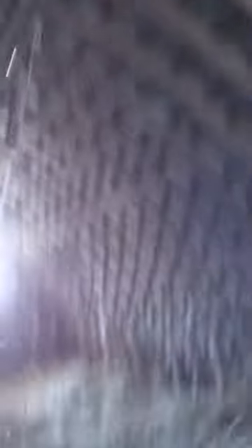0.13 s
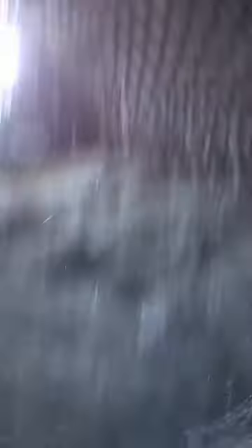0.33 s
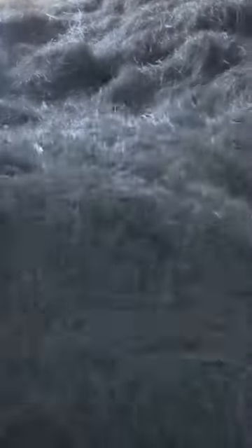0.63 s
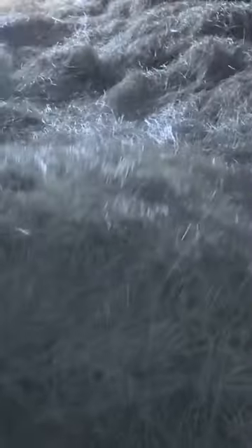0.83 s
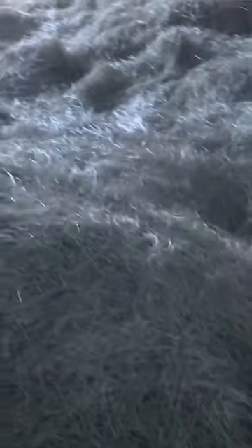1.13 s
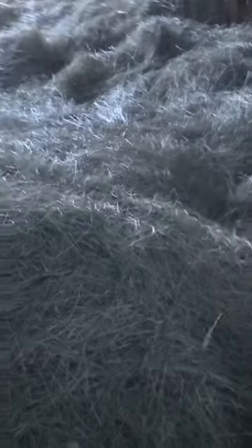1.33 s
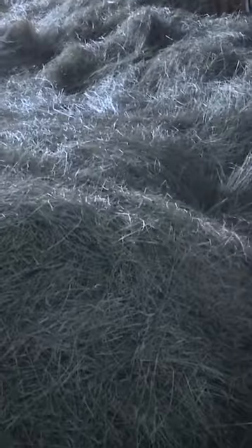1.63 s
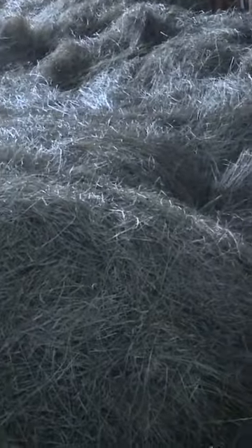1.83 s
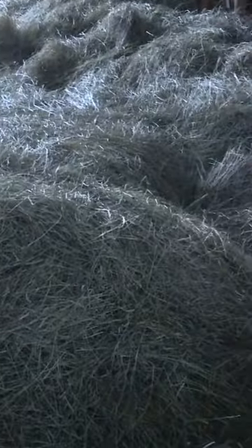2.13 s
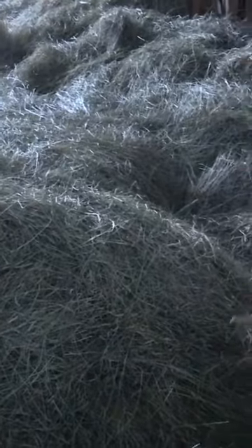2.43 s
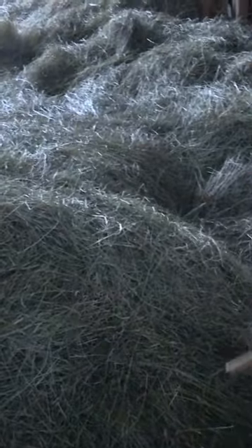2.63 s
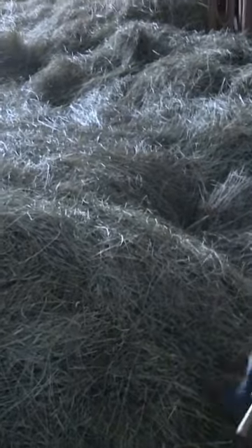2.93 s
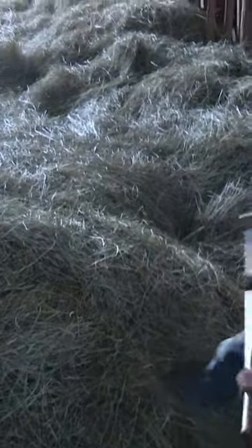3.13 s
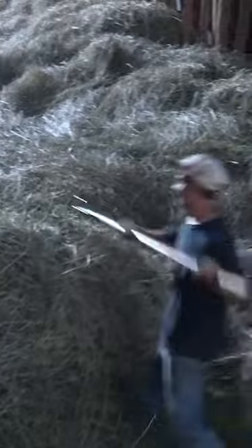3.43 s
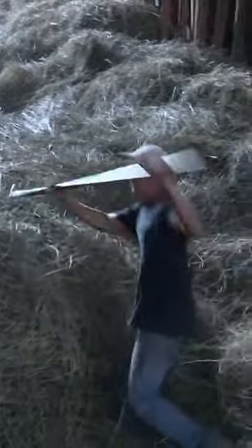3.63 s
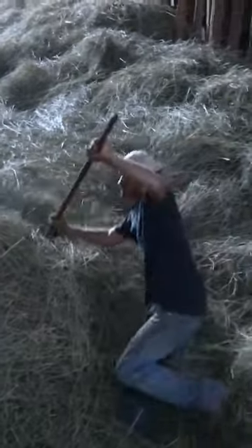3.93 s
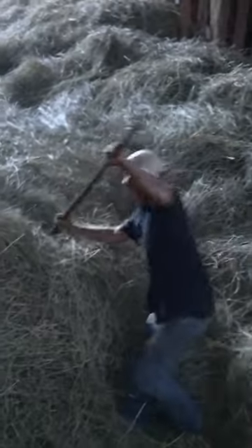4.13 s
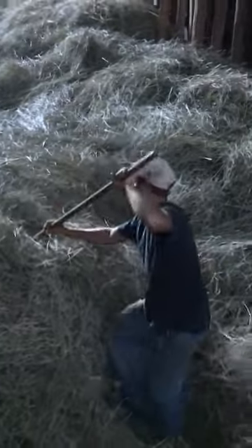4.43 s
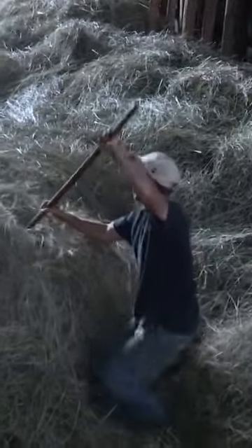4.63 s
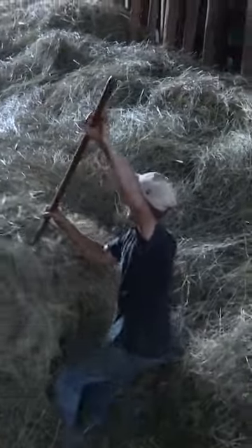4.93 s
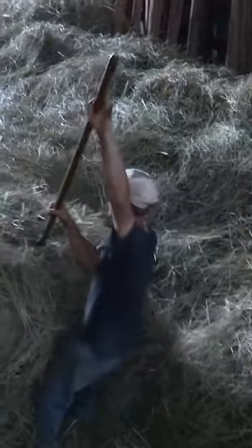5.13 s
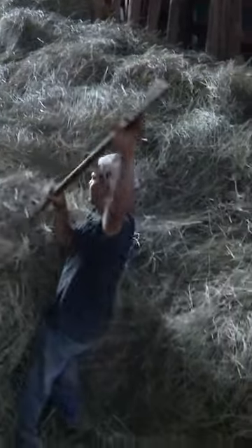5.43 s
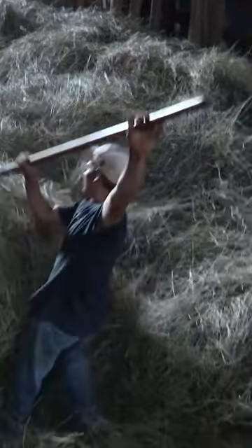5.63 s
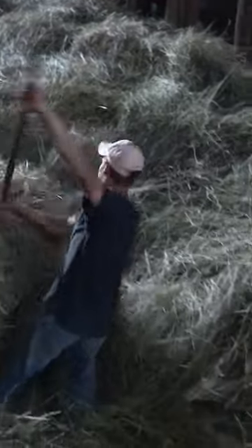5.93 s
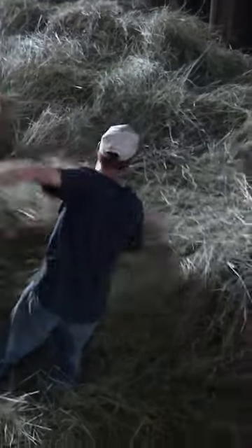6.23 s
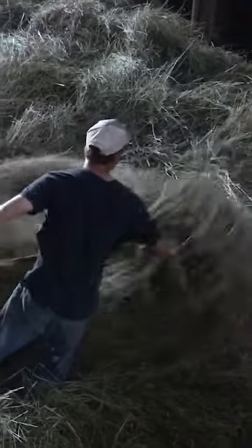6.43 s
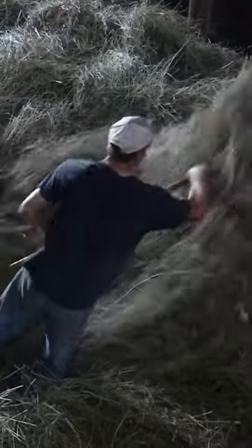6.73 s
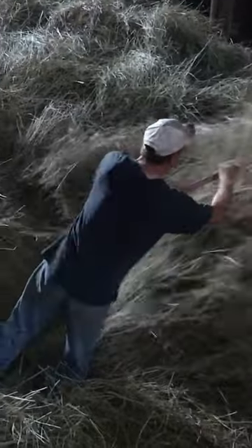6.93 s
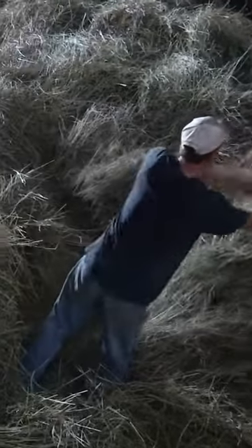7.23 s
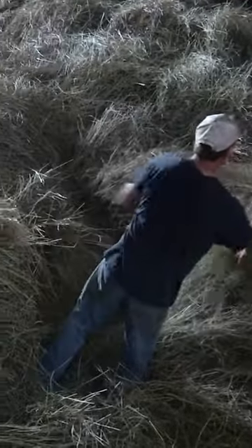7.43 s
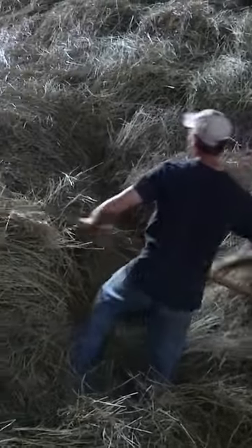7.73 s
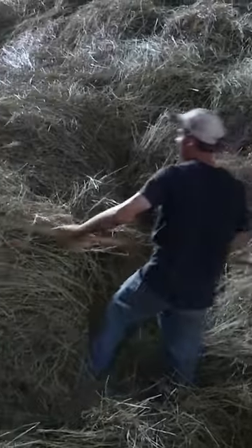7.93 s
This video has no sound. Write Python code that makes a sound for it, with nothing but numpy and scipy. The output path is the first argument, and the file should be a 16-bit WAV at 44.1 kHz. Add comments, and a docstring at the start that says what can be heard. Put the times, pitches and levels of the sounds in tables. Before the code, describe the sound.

Bright metallic rattle and hay rustle open abruptly, wind bumps the microphone, a quiet lull follows, then crackling hay heaves and dull floor knocks.

```python
"""Dry hay is trodden, forked and thrown in a wooden barn loft: random snap impulses over noise, in swells.
Loose fork steel rattles as decaying tine modes under noise clacks; lone stalks break as short noise bursts.
Steps and knocks thud as board modes; air buffets the swinging hand-held microphone as low noise in gusts.
A far motor hums as two wavering sines over steady coloured barn noise. Steel and lone snaps reverberate.
All sources reach one microphone, whose signal clips on loud peaks and loses its top."""
import sys
import numpy as np
from scipy import signal
from scipy.fft import rfft, irfft
from scipy.io import wavfile

SR = 44100
rng = np.random.default_rng(int(sys.argv[2]) if len(sys.argv) > 2 else 0)


def store_pcm(level_fs):
    """Save levels as 16-bit WAV."""
    pcm = np.round(np.clip(level_fs, -1, 1) * 32767).astype(np.int16)
    wavfile.write(sys.argv[1], SR, np.atleast_2d(pcm).T)


N = 356680

# Steady barn noise spectrum. Each row: frequency in Hz, relative spectral density in dB per Hz.
BARN_SPECTRUM = [(15, -45), (25, -11.5), (133, -5.5), (403, -16), (814, -15), (907, -17.5), (1100, -18),
                 (2400, -20), (5390, -20.5), (11200, -26.5), (15900, -34)]
# Motor tone. Each row: time in seconds, frequency in Hz, level in dB.
MOTOR_CURVE = [(2.2, 128.8, -58), (3.2, 127.4, -61), (4.0, 126.5, -49), (5.15, 125, -53), (5.4, 124.6, -46),
               (8.09, 126, -50.5)]
# Gusts on the swinging microphone. Each row: start of full level in seconds, hold in seconds, level in dB,
# rise in seconds per 20 dB, fall in seconds per 20 dB, bright share of power 0-1.
GUST_SWELLS = [(.02, 0.017, -49, .05, .03, 0.8), (.3, .18, -39.5, 0.12, .1, 0),
               (.55, 0.0087, -37, 0.057, 0.12, 0), (1.01, 0.011, -29.5, 0.15, 0.11, 0.03),
               (1.2, .08, -53, .1, .1, 0.02), (1.55, .03, -31, 0.31, .3, 0.11),
               (1.71, 0.0068, -33, .15, 0.14, 0.11), (1.86, 0.015, -36.5, 0.16, 0.37, 0.02),
               (2.46, .01, -54, 0.046, .04, 0.1), (2.82, 0.017, -41, .05, 0.24, 0),
               (3.0, 0.22, -48.5, .2, 0.71, 0.34)]
# Steps and knocks in the boards. Each row: start in seconds, peak in dB, hardness in dB per octave.
BOARD_BLOWS = [(2.812, -33.5, 2), (3.238, -45, 1), (3.787, -29, 3), (4.185, -38.5, -4), (4.519, -54, 12),
               (4.641, -39, 3), (5.158, -45, 2), (5.308, -33, 13), (5.399, -33, 8), (5.63, -34, 5),
               (6.219, -44, -7), (6.536, -41, -2), (6.913, -31, 9.5), (7.027, -41, 4), (7.619, -35.5, 5),
               (7.869, -33.5, 2.5), (7.931, -37, 4)]
# Floor board modes. Each row: frequency in Hz, relative gain in dB, time to decay 60 dB in seconds.
BOARD_MODES = [(52, 5.5, 0.77), (76.6, 11, 0.25), (113, 5, 0.26), (235, 10.5, 0.035), (298, 1.5, 0.11)]
# Lone breaking stalks. Each row: start in seconds, peak in dB, upper band edge in Hz.
LONE_SNAPS = [(2.396, -35, 4060), (2.627, -31, 9000), (2.643, -33, 1850), (2.690, -29, 10800),
              (2.944, -22, 12000), (3.047, -28, 9000), (4.412, -21.5, 3500)]
# Mode frequencies in Hz of the short and the long fork tines.
SHORT_TINE_MODES_HZ = [1325, 1588, 1910, 2309, 2590, 2908, 3004, 3435, 3887, 4398, 4800, 5320, 5880, 6428,
                       6621, 7000, 7585, 7843, 8226, 8915, 9077, 9480, 9830, 10200, 10930, 11590, 12310,
                       12800, 13780, 14580]
LONG_TINE_MODES_HZ = [1034, 1270, 1561, 1857, 2223, 2503, 2681, 3345, 3828, 4188, 4753, 5238, 5626, 6223,
                      6485, 7262, 7499, 8156, 8800, 9534, 10300, 10620, 11130, 11830, 12660, 13420, 14300]
# Jolts of the loose steel. Each row: start in seconds, level in dB, free ringing before damping in seconds,
# colour centre in semitones from 4 kHz, best struck frequency in Hz, share of the long tines 0-1.
STEEL_JOLTS = [(.001, -23, 0.085, -16, 1857, 0.6), (0.029, -16, 0.025, -8, 1300, 0.9),
               (.031, -10, 0.016, -4, 1561, 0.52), (.030, -8, 0.018, 16, 11830, 0.6),
               (.038, -12.5, 0.045, 17, 8156, 0.3), (.081, -31, 0.12, 0, 3345, .85),
               (0.121, -31, 0.052, 1, 2503, 0.5), (0.33, -8.5, 0.01, 24, 11590, 0.4),
               (0.335, -11.5, 0.026, 1, 3340, 0.3), (0.342, -8.5, 0.11, 28, 8226, 0),
               (.358, -12, .095, 7.5, 3435, 0.05), (.41, -21, 0.039, -1, 5880, .1),
               (0.851, -21.5, 0.025, 6.5, 8226, 0.37), (.875, -34, .035, 3, 3435, 0.1),
               (1.124, -21.5, 0.019, -4.5, 2590, 0), (1.124, -19.5, 0.069, 8, 9077, .2),
               (1.130, -11.5, 0.027, 13, 8226, .1), (1.131, -18, .071, -3, 3435, 0.42),
               (1.176, -23.5, 0.034, 9, 6428, .2), (1.213, -23, .035, 2.5, 8226, 0.2),
               (1.256, -26, 0.02, 2, 4720, 0.6), (1.315, -38, .078, 1, 2590, 0.1),
               (1.612, -46, 0.02, -14, 3828, .4), (1.648, -25, .049, 7.5, 3410, .36),
               (1.655, -24.5, 0.025, -6.5, 2330, 0.58), (1.69, -34, 0.022, -6, 4398, 0.2),
               (1.72, -42, 0.037, -1, 3435, .2), (1.857, -35, 0.034, -3, 2680, 0.31),
               (1.971, -51, .05, -25, 1270, 0.6), (2.32, -38.5, 0.026, 13, 5880, 0.7),
               (2.327, -39, 0.019, -2, 3435, 0.1), (2.396, -36.5, 0.019, -1, 2590, 0.6),
               (2.405, -38.5, 0.058, 4, 3840, 0.43), (2.806, -37.5, 0.018, 6, 5880, 0.3),
               (3.087, -28.5, 0.018, -11.5, 1450, 0.9), (3.099, -24.5, 0.031, 7, 2590, 0.6),
               (3.11, -26, 0.03, -6, 3345, 0.2), (3.151, -29.5, .04, -4, 3345, 0.4),
               (4.398, -32, .02, 2, 3330, 0.24), (4.425, -37.5, 0.025, -8, 3435, 0.2),
               (5.326, -28, .03, 11, 3887, 0.5), (5.849, -40.5, 0.053, -12, 1325, 0.2),
               (6.186, -22, .027, 11, 7000, 0.1), (6.196, -23, 0.03, 2, 3435, 0.62),
               (6.249, -21, 0.017, 8, 6621, .2), (6.251, -27, 0.026, 5, 3435, .2)]
# Hay spectrum before tilt. Each row: frequency in Hz, relative spectral density in dB per Hz.
HAY_SPECTRUM = [(120, -43), (200, -42), (278, -15.5), (366, -11), (622, -6), (965, -6), (1580, -0.5),
                (1970, -2.5), (3540, 1.5), (4170, -0.5), (10000, -0.5), (15000, -5), (15900, -9.5)]
# Strokes of feet and fork. Each row: start of full level in seconds, hold in seconds, level before tilt in dB,
# rise in seconds per 20 dB, fall in seconds per 20 dB, tilt from body towards treble in dB.
HAY_STROKES = [(.03, 0.014, -17.5, 0.13, 0.1, 5.5), (.3, 0.087, -20.5, 0.24, 0.21, -2.5),
               (.5, 0.12, -32.5, .1, 0.93, 0.5), (.93, 0.068, -32, 0.34, 0.33, -1),
               (1.15, 0.053, -32.5, 0.058, 0.26, -2.5), (1.68, 0.025, -40, .1, 0.17, -6),
               (1.9, 0.22, -41.5, 0.75, 0.34, -1), (2.3, 0.2, -47.5, 0.26, 0.14, 1),
               (2.8, 0.053, -46.5, 0.18, .3, 4.5), (3.0, 0.18, -40, 0.21, 0.25, 0.5),
               (3.26, 0.19, -30.5, 0.5, 0.36, -3), (3.76, 0.084, -32.5, .15, 0.26, -1.5),
               (4.16, 0.014, -30, 0.13, 0.59, -1.5), (4.35, 0.66, -34, .4, 0.92, -4.5),
               (4.88, 0.43, -30.5, 0.41, 0.33, -0.5), (5.45, 0.11, -40, .3, 0.26, -6),
               (5.71, 0.021, -34, 0.22, 0.13, -3.5), (6.0, 0.23, -27.5, 0.53, 1, 0),
               (6.55, 0.24, -29, 1, 0.94, 0.5), (7.1, 0.19, -35.5, 0.56, 0.27, -6.5),
               (7.43, 0.035, -27, 0.23, 0.25, -1.5), (7.62, 0.14, -34, 0.51, 0.24, -0.5),
               (8.02, 0.048, -38, 0.68, 0.48, -1)]

BARN_AIR_DB = -48.5
UPPER_HUM_RATIO, UPPER_HUM_DB = 1.125, -59   # a second tone sags along with the first
LOFT_T60_S, LOFT_DB = 0.43, -13.5
RING_T60_S_AT_3K, RING_SLOPE = 0.26, -0.78   # the slope is the power of frequency
CLACK_S, CLACK_DB = 0.018, -6
BEST_DB = 11   # boost of tine modes near the best struck frequency
SETTLING_DB = -65   # the heap never quite rests
FLUTTER_DB, FLUTTER_HZ = 0.5, 8
CUTOFF_HZ = 16050


def from_db(db):
    """Amplitude gain is ten to the power of decibels over twenty."""
    return 10 ** (np.asarray(db) / 20)


def rms_one(x):
    """Division by the root mean square gives a signal unit rms."""
    return x / np.sqrt(np.mean(x ** 2) + 1e-20)


def filtered(x, order, edge_hz, kind):
    """A causal Butterworth filter has a maximally flat passband."""
    return signal.sosfilt(signal.butter(order, edge_hz, kind, fs=SR, output="sos"), x)


def in_time(rows):
    """Linear interpolation turns timed rows into one value a sample for each column."""
    s, *columns = np.transpose(rows)
    return [np.interp(np.arange(N) / SR, s, c) for c in columns]


def drift(rate_hz):
    """Two equal poles smooth white noise into a slow random curve of unit rms."""
    step = 40   # samples between drawn points
    pole = np.exp(-2 * np.pi * rate_hz * step / SR)
    white = rng.standard_normal(N // step + 2002)
    slow = signal.lfilter([1], [1, -2 * pole, pole * pole], white)[2000:]   # past the filter's start
    return np.interp(np.arange(N) / step, np.arange(len(slow)), rms_one(slow))


def coloured(x, spectrum):
    """Weighting each frequency gives a dense sound a chosen spectrum, here at unit rms."""
    hz, db = np.transpose(spectrum)
    grid = np.maximum(np.fft.rfftfreq(N, 1 / SR), 1)
    gain = from_db(np.interp(np.log(grid), np.log(hz), db))
    return rms_one(irfft(rfft(x) * gain, N))


def modes(hz, gain, t60, size):
    """A struck body rings as a sum of exponentially dying sines, here at random phases."""
    t = np.arange(size) / SR
    phase = 2 * np.pi * (np.outer(hz, t) + rng.random((len(hz), 1)))
    decay = from_db(-60 * t / np.c_[t60])
    return np.dot(gain, np.sin(phase) * decay)


def add(out, s, sound):
    """Superposition: a sound is summed into the mix from s seconds on."""
    i = round(s * SR)
    out[i:i + len(sound)] += sound[:N - i]


def swells(rows, rest_db):
    """Powers of overlapping swells add; the last column is averaged with power as its weight."""
    t = np.arange(0, N + 64, 64) / SR
    power, mean = from_db(2 * rest_db), 0   # doubled decibels give power
    for s, hold_s, db, rise_s, fall_s, value in rows:
        before = np.maximum(s - t, 0) / max(rise_s, .01)
        after = np.maximum(t - s - hold_s, 0) / max(fall_s, .01)
        swell = from_db(2 * (db - 20 * (before + after)))
        power = power + swell
        mean = mean + value * swell
    return in_time(np.transpose([t, 10 * np.log10(power), mean / power]))


def barn_air():
    """Stationary random noise is fixed by its spectrum and its level."""
    return from_db(BARN_AIR_DB) * coloured(rng.standard_normal(N), BARN_SPECTRUM)


def hum(hz, db, waver_db):
    """A tone's phase is the running sum of its frequency; its level wavers at random."""
    level = np.sqrt(2) * from_db(db + waver_db * drift(6.4))
    return level * np.sin(2 * np.pi * np.cumsum(hz) / SR)


def motor():
    """Two tones in a fixed frequency ratio glide together and waver in level independently."""
    hz, db = in_time(MOTOR_CURVE)
    lower = hum(hz, db, waver_db=0.5)
    upper = hum(UPPER_HUM_RATIO * hz, UPPER_HUM_DB, waver_db=0.5)
    return lower + upper


def buffet(lumpy_db=3.0):
    """Air pressing on the microphone gives lumpy low noise; sharp gusts shift power to a brighter band."""
    db, share = swells(GUST_SWELLS, rest_db=-82)
    dull = rms_one(filtered(rng.standard_normal(N), 2, [42, 137], "band"))
    bright = rms_one(filtered(rng.standard_normal(N), 2, [120, 337], "band"))
    share = np.clip(share, 0, 1)
    mixed = np.sqrt(1 - share) * dull + np.sqrt(share) * bright
    return from_db(db + lumpy_db * drift(19.4)) * mixed


def thuds():
    """A soft push rings the modes of the floor boards; a harder push favours the higher modes."""
    hz, db, t60 = np.transpose(BOARD_MODES)
    out = np.zeros(N)
    for s, peak_db, hard_db in BOARD_BLOWS:
        luck_db = 2.0 * rng.standard_normal(len(hz))
        gain = from_db(db + hard_db * np.log2(hz / 100) + luck_db)
        ring = modes(hz, gain, t60, size=round(.4 * SR))
        thud = signal.lfilter([.03], [1, -.97], ring)   # softens the onset
        add(out, s, from_db(peak_db) * thud / np.abs(thud).max())
    return out


def loft(x):
    """Convolution with dull, exponentially decaying noise gives the reverberation of a hay-filled loft."""
    t = np.arange(round(.5 * SR)) / SR
    dull = signal.lfilter([.45], [1, -.55], rng.standard_normal(len(t)))
    tail = dull * from_db(-60 * t / LOFT_T60_S) * (t > .008)   # silent for the first 8 ms
    return signal.fftconvolve(x, tail / np.sqrt(np.sum(tail ** 2)))[:N]


def snaps():
    """A breaking stalk releases its strain as a few milliseconds of dying band-limited noise."""
    out, t = np.zeros(N), np.arange(600) / SR
    for s, peak_db, top_hz in LONE_SNAPS:
        burst = rng.standard_normal(len(t)) * np.exp(-t / .0005)
        burst = filtered(burst, 2, [400, top_hz], "band")
        add(out, s, from_db(peak_db) * burst / np.abs(burst).max())
    return out


def steel(luck_db=3, damp_t60_s=0.026, best_lasts=1, rise_s=0.00036):
    """A jolt excites the tine modes under a noisy clack; a touch then damps them all."""
    hz = np.array(SHORT_TINE_MODES_HZ + LONG_TINE_MODES_HZ)
    is_long = np.arange(len(hz)) >= len(SHORT_TINE_MODES_HZ)
    size = round(.15 * SR)
    t, out = np.arange(size) / SR, np.zeros(N)
    grid = np.maximum(np.fft.rfftfreq(size, 1 / SR), 1)
    for s, level_db, ring_s, centre, best_hz, long_share in STEEL_JOLTS:
        def colour(f):
            """A bell-shaped excitation spectrum falls 6 dB at 14 semitones from its centre."""
            return from_db(-6 * ((12 * np.log2(f / 4000) - centre) / 14) ** 2)
        share = np.clip(long_share, 0, 1)
        best = np.exp(-((hz - best_hz) / 100) ** 2)
        # the free tine rings longest
        t60 = RING_T60_S_AT_3K * (hz / 3000) ** RING_SLOPE * (1 + best_lasts * best)
        luck = from_db(BEST_DB * best + luck_db * rng.standard_normal(len(hz)))
        gain = np.where(is_long, share, 1 - share) * colour(hz) * luck
        ring = modes(hz, np.sqrt(2) * gain / np.linalg.norm(gain), t60, size)
        # modes too close to tell apart
        dense = rms_one(irfft(rfft(rng.standard_normal(size)) * colour(grid), size))
        clack = from_db(CLACK_DB) * dense * np.exp(-t / CLACK_S)
        onset = 1 - np.exp(-t / rise_s)
        damping = from_db(-60 * np.maximum(t - ring_s, 0) / damp_t60_s)
        add(out, s, from_db(level_db) * (ring + clack) * onset * damping)
    return filtered(out, 2, 800, "high")   # thin steel radiates no bass


def hay(snaps_per_s=6000.0, spread_db=3.0, slide_db=4.0):
    """Random snap impulses over the noise of sliding stems form a dense rustle, tilted by each stroke."""
    rustle_db, tilt_db = swells(HAY_STROKES, SETTLING_DB)
    sizes = from_db(spread_db * np.minimum(rng.exponential(1, N), 5)) * rng.choice([-1, 1], N)
    # the snap rate itself drifts
    born = rng.random(N) < snaps_per_s * from_db(3.0 * drift(25.0)) / SR
    sliding = from_db(slide_db) * rng.standard_normal(N)
    grain = coloured(rms_one(sizes * born) + sliding, HAY_SPECTRUM)
    # zero-phase filters keep the bands aligned with the grain
    treble = signal.sosfiltfilt(signal.butter(1, 8000, "high", fs=SR, output="sos"), grain)
    body = signal.sosfiltfilt(signal.butter(1, 1500, fs=SR, output="sos"), grain)
    tilted = grain + (from_db(tilt_db) - 1) * treble + (from_db(-.6 * tilt_db) - 1) * body
    return from_db(rustle_db + FLUTTER_DB * drift(FLUTTER_HZ)) * tilted


def scene():
    """Pressures of all sources add at one microphone, heard alike in both channels."""
    background = barn_air() + motor() + buffet()
    struck = steel() + snaps()
    mono = background + thuds() + struck + from_db(LOFT_DB) * loft(struck) + hay()
    return np.stack([mono, mono])


def record(dry):
    """Overload clips the loudest peaks, then a steep low-pass filter removes the top."""
    clipped = np.clip(dry, -.9, .9)
    return signal.sosfilt(signal.cheby2(22, 70, CUTOFF_HZ, fs=SR, output="sos"), clipped)


dry = scene()
out = record(dry)
store_pcm(out)
```